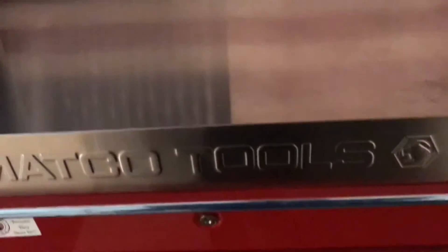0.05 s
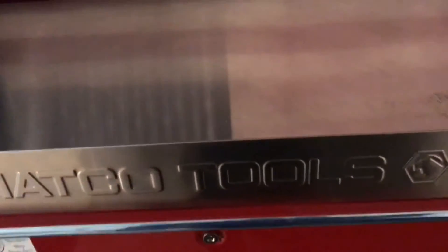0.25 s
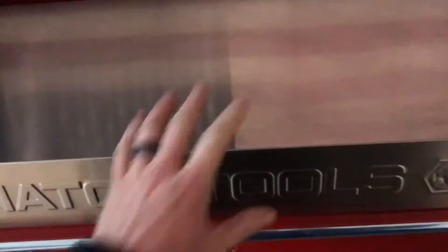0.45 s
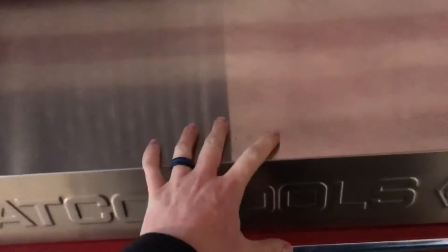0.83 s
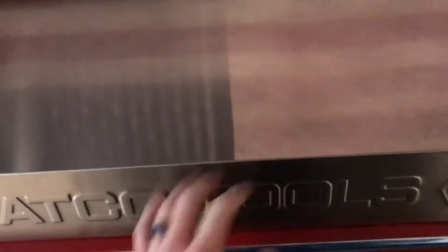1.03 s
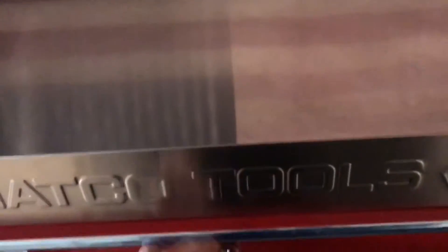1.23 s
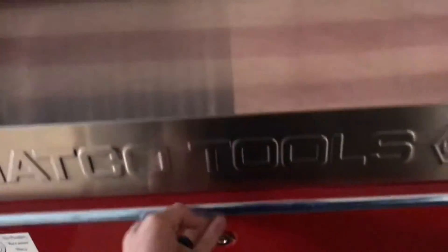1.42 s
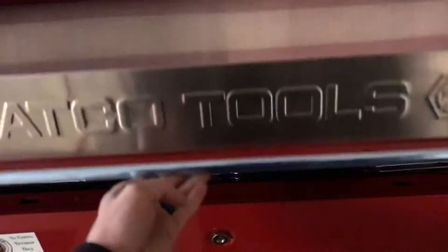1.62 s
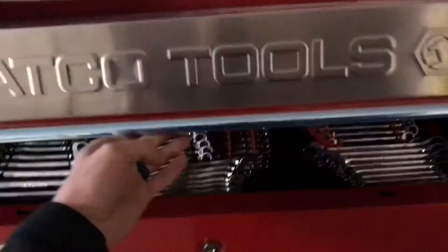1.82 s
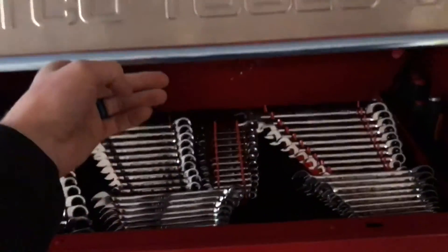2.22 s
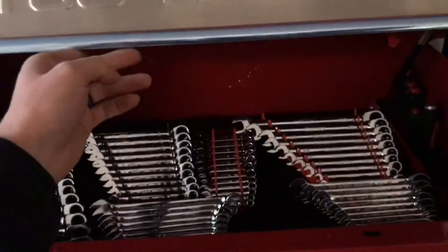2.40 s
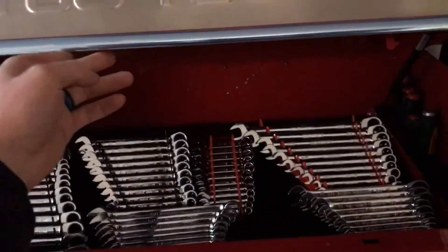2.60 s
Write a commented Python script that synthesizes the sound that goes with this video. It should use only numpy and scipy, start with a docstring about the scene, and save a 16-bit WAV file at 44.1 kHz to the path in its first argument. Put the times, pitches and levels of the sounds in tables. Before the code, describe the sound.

Over the steady hum of workshop fans, a palm smacks the top of a metal tool chest with a short, ringing boom. Small clicks come next, and the lid lifts with a soft hiss.

```python
"""A slap on a steel tool chest

In a workshop with droning ventilation, a flat hand slaps the top of a steel tool chest.
The sheet metal booms in its normal modes and the room reverberates. The hand slides off and grips
the edge with a few light clicks; the lid swings up with a soft hiss, probably from its struts."""
import sys
import numpy as np
from scipy import signal
from scipy.fft import irfft
from scipy.io import wavfile
from scipy.ndimage import uniform_filter1d, map_coordinates

SR = 44100
rng = np.random.default_rng(int(sys.argv[2]) if len(sys.argv) > 2 else 0)


def bounce(signal):
    """Save signal as a 16-bit WAV file at the path given by the first command-line argument."""
    frames = np.transpose(np.atleast_2d(signal))
    limited = np.clip(frames, -1, 1)
    pcm = np.round(limited * 32767).astype(np.int16)
    wavfile.write(sys.argv[1], SR, pcm)


N = 121275
TIME, AGE = np.arange(N) / SR, np.arange(SR) / SR  # seconds into the scene, and since an impact
ROOM_RISE_S, GLIDE_HZ_PER_S = 0.016, 2200


def amp(db):
    """Amplitude ratio of a level in decibels."""
    return 10 ** (np.asarray(db) / 20)


def unit(x):
    """Normalisation to an rms of 1."""
    return x / np.sqrt(np.mean(x ** 2) + 1e-20)


def read(table, hz, column=1):
    """Interpolation of a table column on a log-frequency axis."""
    columns = np.transpose(table)
    return np.interp(np.log(hz + 1), np.log(columns[0] + 1), columns[column])


def envelope(table, column=1):
    """Gain over time, interpolated in decibels."""
    columns = np.transpose(table)
    return amp(np.interp(TIME, columns[0], columns[column]))


def add(mix, start, sound):
    """Superposition of a sound from a start in seconds."""
    part = mix[max(round(start * SR), 0):][:len(sound)]
    part += sound[:len(part)]


def noise(gain, size):
    """Random-phase noise of rms 1 with a spectrum shaped by gain(Hz)."""
    hz = np.fft.rfftfreq(size, 1 / SR)
    phases = np.exp(2j * np.pi * rng.random(len(hz)))
    return unit(irfft(gain(hz) * phases, size))


def coloured(table, size, column=1):
    """Noise with the spectral envelope of a table column."""
    return noise(lambda hz: amp(read(table, hz, column)), size)


def band(centre_hz, octaves, size):
    """Noise in a Gaussian band on a log-frequency axis."""
    return noise(lambda hz: np.exp(-.5 * (np.log2((hz + 1) / centre_hz) / octaves) ** 2), size)


def strike(rise_s, t60):
    """Linear attack and exponential decay, 60 dB in t60 seconds."""
    return np.minimum(AGE / rise_s, 1) * np.exp(-np.log(1000) * AGE / t60)


def ring(modes, rise_cycles):
    """Free vibration as a sum of damped modes; low modes build up more slowly."""
    return sum((-1) ** k * amp(db) * strike(rise_cycles / hz, t60) * np.sin(2 * np.pi * hz * AGE)
               for k, (hz, db, t60) in enumerate(modes))


# Spectrum of the airflow. Each row: frequency in Hz, relative level in dB.
AIRFLOW = [(20, 6.5), (32, 5), (48, -10.5), (66, -3), (85, -4), (108, -8), (130, -7.5), (200, -11),
           (300, -14.5), (380, -10.5), (520, -14), (680, -20.5), (1100, -22), (1600, -33.5), (2300, -42.5),
           (3300, -48.5), (5200, -48), (8500, -58.5), (10800, -53.5), (12500, -61.5), (16000, -63.5)]
# Fan drones. Each row: centre in Hz, half width in Hz, level in dB.
FAN_DRONES = [(60.3, 2.3, -45.5), (103.7, 7.2, -48.5), (238.4, 4.5, -54), (300, 19, -47), (299, 30, -49.5),
              (436.9, 8.7, -48.5), (601, 62, -57.5), (685, 32, -54.5), (840, 15, -62)]

def ventilation():
    """Broadband flow noise rushes unevenly under fan drones, which waver as narrowband noise does."""
    _, _, spectrum = signal.stft(coloured(AIRFLOW, N), SR, nperseg=1024, noverlap=768)
    patches = uniform_filter1d(rng.standard_normal(spectrum.shape), size=10, axis=0)
    ripple_db = 2.3 * unit(uniform_filter1d(patches, size=14, axis=1))
    rush = signal.istft(spectrum * amp(ripple_db), SR, nperseg=1024, noverlap=768)[1][:N]
    drones = sum(amp(db) * noise(lambda hz: 1 / (1 + ((hz - centre_hz) / width) ** 2), N)
                 for centre_hz, width, db in FAN_DRONES)
    return amp(-36.5) * rush + drones


# Strength of the buffeting. Each row: time in seconds, level in dB.
BUFFET_LEVELS = [(0, -27), (.45, -40), (.55, -20), (.75, -20), (.92, -12.5), (1.15, -29), (1.4, -17.5),
                 (1.65, -43.5), (2.75, -33)]
# Its spectrum. Each row: frequency in Hz, relative level in dB.
BUFFET_SPECTRUM = [(0, -30), (1.5, -2), (4, 0), (10, -14), (25, -29), (60, -48), (200, -80), (1000, -120)]

def buffet():
    """Air displaced as the arm and microphone move causes mostly infrasonic pressure swings."""
    return envelope(BUFFET_LEVELS) * coloured(BUFFET_SPECTRUM, N)


# Brushing of sleeve and skin. Each row: peak time in seconds, spread in seconds, level in dB,
# centre in Hz, spread in octaves.
BRUSH_STROKES = [(.03, 0.021, -66.5, 4000, 0.51), (.138, .012, -68, 7700, 0.24),
                 (.205, 0.055, -61, 3000, 1.3), (.3, 0.035, -66, 5000, 0.62), (.5, 0.45, -58, 1070, 0.61),
                 (.56, 0.18, -67, 5000, 0.82), (0.695, 0.0053, -48, 6500, 0.4),
                 (1.2, 0.034, -70.5, 8000, .6), (2.13, 0.054, -71, 4830, .15),
                 (2.42, 0.036, -62.5, 2200, 0.56)]

def rubs():
    """Sliding friction makes soft swells of band-limited noise."""
    out = np.zeros(N)
    for peak_s, spread_s, db, centre_hz, octaves in BRUSH_STROKES:
        swell = np.exp(-.5 * ((TIME - peak_s) / spread_s) ** 2)
        out += amp(db) * band(centre_hz, octaves, N) * swell
    return out


# Thin squeaks. Each row: start in seconds, duration in seconds, frequency in Hz, level in dB.
SQUEAK_TONES = [(.086, .045, 14550, -76), (.155, .025, 14550, -69), (.197, .034, 11800, -68),
                (.19, .055, 14570, -72)]

def squeaks():
    """A brief, high pure tone under a half-sine envelope is heard as a squeak."""
    out = np.zeros(N)
    for start, length, hz, db in SQUEAK_TONES:
        t = np.arange(0, length, 1 / SR)
        swell = np.sin(np.pi * t / length)
        add(out, start, amp(db) * unit(swell * np.sin(2 * np.pi * hz * t)))
    return out


# Light touches and latch clicks. Each row: start in seconds, knock level in dB, click level in dB,
# click centre in Hz, tick level in dB, T60 in seconds.
TOUCHES = [(.089, -66, -68, 3000, -67, 0.12), (.152, -55, -49, 2800, -46, .075),
           (.4535, -69, -68, 4550, -63, 0.072), (0.568, -46, -62, 4500, -68, 0.084),
           (0.6432, -28.5, -50.5, 3030, -48.5, 0.088), (.684, -27.5, -51.5, 2200, -60, 0.09),
           (.8325, -51, -35.5, 1940, -62, 0.045), (1.2848, -52, -55, 4500, -55.5, 0.051),
           (1.2938, -41, -78, 2000, -70, 0.12), (1.455, -61, -52, 3440, -78, 0.053)]
# Spectra of a touch. Each row: frequency in Hz, relative levels of knock and tick in dB.
TOUCH_SPECTRA = [(50, -14, -50), (140, -3, -50), (300, -7, -45), (600, -10, -35), (920, -2, -30),
                 (1600, -20, -18), (3100, -40, -10), (5500, -55, -1), (10000, -70, 0), (16000, -80, -7)]

def taps():
    """Brief contacts excite a wide spectrum: a dull panel knock, a click and a bright tick."""
    out = np.zeros(N)
    room_decay = amp(-14.5) * strike(ROOM_RISE_S, t60=0.35)
    for start, knock_db, click_db, click_hz, tick_db, t60 in TOUCHES:
        knock = amp(knock_db) * coloured(TOUCH_SPECTRA, SR)
        tick = amp(tick_db) * coloured(TOUCH_SPECTRA, SR, column=2)
        click = amp(click_db) * band(click_hz, octaves=.55, size=SR)
        decay = np.hypot(strike(0.0024, t60), room_decay)  # direct and reverberant powers add
        add(out, start, (knock + tick + click) * decay)
    return out


# Modes of a small metal piece. Each row: frequency in Hz, relative level in dB, T60 in seconds.
CLINK_MODES = [(2700, -4, .08), (3000, -2, .08), (5100, -6, .07), (6750, -10, .2), (7600, -8, .08),
               (9750, -2, .06), (10150, -2, .04), (12800, -8, .04)]

def clink():
    """A loose piece of metal rings once in high, inharmonic modes."""
    out = np.zeros(N)
    add(out, start=.152, sound=amp(-48) * ring(CLINK_MODES, rise_cycles=7.3))
    return out


# Spectra of skin smack and flesh thud. Each row: frequency in Hz, relative level in dB.
SMACK_SPECTRUM = [(100, 11), (600, 7), (1200, 2), (1700, -4), (2700, -14), (4300, -4), (5500, -9),
                  (6900, 0), (7800, -7.5), (11000, -4.5), (12300, -9), (16000, -18)]
THUD_SPECTRUM = [(40, -37), (120, -26.5), (230, -14), (380, -20), (620, -12), (1100, -5.5), (1600, -15.5),
                 (3000, -10), (16000, -72)]

def hand_impact(smack_db, push_db):
    """Impact noise is broadband and short: skin smacks the steel and flesh thuds on it."""
    smack = amp(smack_db) * coloured(SMACK_SPECTRUM, SR) * strike(rise_s=0.0031, t60=0.083)
    thud = amp(push_db - 5) * coloured(THUD_SPECTRUM, SR) * strike(rise_s=0.009, t60=0.063)
    return smack + thud


# Modes of the steel trim and top panel. Each row: frequency in Hz, relative level in dB, T60 in seconds.
TRIM_MODES = [(4770, -5, .16), (6610, -3, .19), (6813, -4, .14), (6995, 0, .19), (7170, -4, .12),
              (8532, -4, .17), (9320, -4, .09), (10371, -6, .17), (13500, -8, .13)]
PANEL_MODES = [(155, -7, .55), (216, -10, .28), (320, 0, .52), (367, -1, .45), (392, -4, .33),
               (466, -12, .35), (498, -6, .38), (592, 2, .25), (659, 1, .25), (724, -4, .24),
               (804, -3, .27), (921, -6, .35), (955, -6, .33), (1084, -10, .26), (1136, -10, .24),
               (1190, -10, .31), (1275, -15, .3), (1466, -18, .42)]

def steel_ring(smack_db, finger_db, palm_db, palm_delay_s, split_hz=430):
    """Modal excitation: fingers ring the trim and upper panel modes, then the palm starts the boom."""
    upper = [mode for mode in PANEL_MODES if mode[0] >= split_hz]
    deep = [mode for mode in PANEL_MODES if mode[0] < split_hz]
    out = amp(smack_db - 15) * ring(TRIM_MODES, rise_cycles=7.3)
    out += amp(finger_db - 4) * ring(upper, rise_cycles=4.6)
    add(out, palm_delay_s, amp(palm_db - 4) * ring(deep, rise_cycles=1.2))
    return out


# Reverberation of the workshop. Each row: frequency in Hz, relative level in dB, T60 in seconds.
ROOM_BANDS = [(60, -13, 0.31), (150, -4, 0.46), (234, -3, 0.69), (327, -3, 0.83), (530, -3, 0.5),
              (1010, -7.5, 0.59), (1610, -21, 0.69), (2600, -27.5, 0.52), (3960, -17, 0.6),
              (5870, -22.5, 0.51), (8250, -26.5, 0.47), (11000, -24, 0.33), (12500, -31, .33),
              (16100, -29, 0.24)]

def room_tail():
    """A diffuse field decays exponentially, each band with its own reverberation time."""
    hz, t, spectrum = signal.stft(coloured(ROOM_BANDS, SR), SR, nperseg=512, noverlap=384)
    decay = np.exp(-np.log(1000) * t / read(ROOM_BANDS, hz, column=2)[:, None])
    tail = signal.istft(spectrum * decay, SR, nperseg=512, noverlap=384)[1][:SR]
    return amp(-19.5) * tail * np.minimum(AGE / ROOM_RISE_S, 1)


# Two finger contacts, then the palm. Each row: start in seconds, relative levels in dB of the skin
# smack and of the push on the panel.
HAND_CONTACTS = [(0.6974, -14, -20.5), (0.704, -17, -29.5), (0.7143, -46, -19)]

def slap():
    """Impulsive excitation: three contacts fuse into one slap that sets steel and room ringing."""
    out = np.zeros(N)
    for start, smack_db, push_db in HAND_CONTACTS:
        add(out, start, hand_impact(smack_db, push_db))
    (finger_s, smack_db, finger_db), _, (palm_s, _, palm_db) = HAND_CONTACTS
    add(out, finger_s, steel_ring(smack_db, finger_db, palm_db, palm_s - finger_s))
    add(out, finger_s, room_tail())
    return out


# Hiss of the rising lid. Each row: time in seconds, levels of body and treble in dB.
HISS_LEVELS = [(1.4, -73.5, -95), (1.5, -73, -76), (1.62, -66.5, -67), (1.8, -67, -67), (1.95, -65, -67.5),
               (2.14, -65.5, -70), (2.3, -70, -82), (2.45, -74, -88), (2.55, -100.5, -101)]
# Its spectra. Each row: frequency in Hz, relative levels of body and treble in dB.
HISS_SPECTRA = [(1500, -34, -50), (3620, -5.5, -40), (4900, 2.5, -30), (5900, 1.5, -25), (6960, 1.5, -18),
                (8800, 1.5, -17), (12000, -5, -3), (13700, -8, 2), (15800, -21, -9)]

def struts(streak_hz=150, streak_s=.1):
    """Sliding noise, with a spectral ripple heard as faint narrow streaks drifting upward."""
    hiss = sum(envelope(HISS_LEVELS, column) * coloured(HISS_SPECTRA, N, column) for column in (1, 2))
    hz, t, spectrum = signal.stft(hiss, SR, nperseg=1024, noverlap=768)
    across = (hz[:, None] - GLIDE_HZ_PER_S * t) / streak_hz
    along = np.broadcast_to(t / streak_s, across.shape)
    ripple_db = 3 * map_coordinates(rng.standard_normal((256, 64)), [across, along], order=3, mode="wrap")
    return signal.istft(spectrum * amp(ripple_db), SR, nperseg=1024, noverlap=768)[1][:N]


# Whistles in the hiss. Each row: start in seconds, duration in seconds, initial pitch in Hz, level in dB.
WHISTLE_GLIDES = [(1.47, 0.24, 7500, -74.5), (1.44, 0.19, 10500, -76.5), (1.551, 0.22, 5550, -83),
                  (1.717, 0.21, 6900, -72), (1.95, .25, 5950, -79), (2.101, 0.32, 7200, -76.5)]

def whistles(half_width_hz=190):
    """Amplitude modulation by noise broadens each rising tone into a narrow, airy band."""
    out = np.zeros(N)
    for start, length, start_hz, db in WHISTLE_GLIDES:
        t = np.arange(0, length, 1 / SR)
        flutter = noise(lambda hz: 1 / (1 + (hz / half_width_hz) ** 4), SR)[:len(t)]
        swell = np.sin(np.pi * t / length)
        cycles = np.cumsum(start_hz + GLIDE_HZ_PER_S * t) / SR
        add(out, start, amp(db) * unit(flutter * swell * np.sin(2 * np.pi * cycles)))
    return out


def scene():
    """Linear superposition: the pressures of all sources add in one channel."""
    chest = slap() + taps() + clink() + rubs() + squeaks() + struts() + whistles()
    return (chest + ventilation() + buffet())[None]


def record(dry, cutoff_hz=15800):
    """Band limiting by a linear-phase low-pass filter."""
    lowpass = signal.firwin(511, cutoff_hz, window=("kaiser", 9), fs=SR)
    return signal.oaconvolve(dry, lowpass[None], "same")


dry = scene()
out = record(dry)
bounce(out)
```